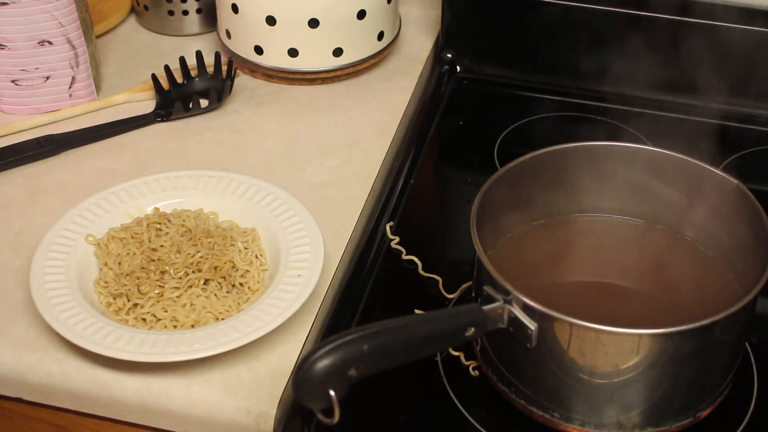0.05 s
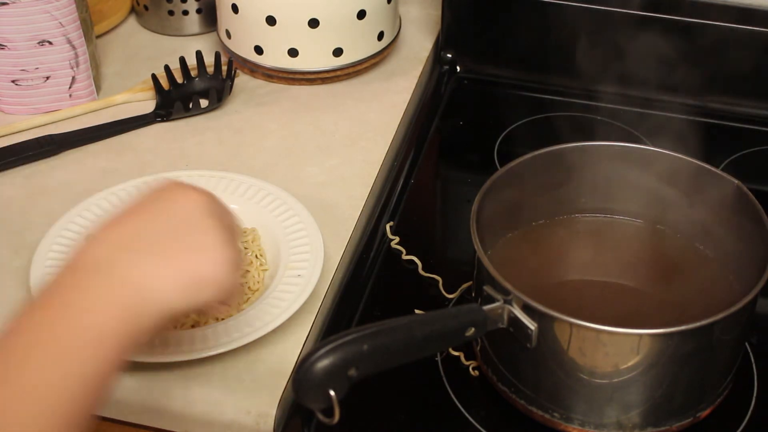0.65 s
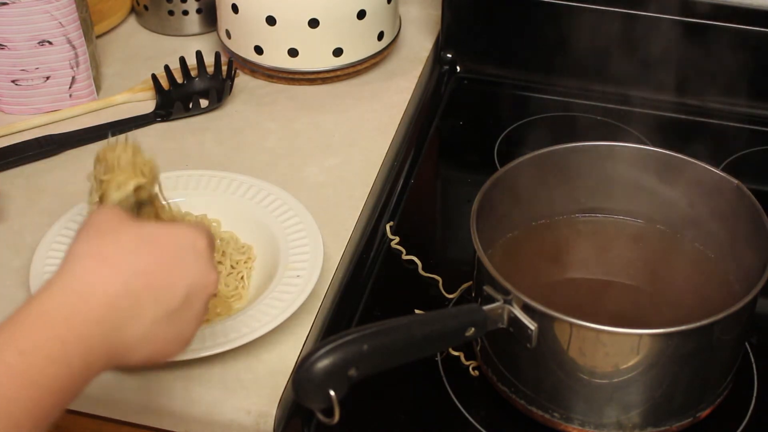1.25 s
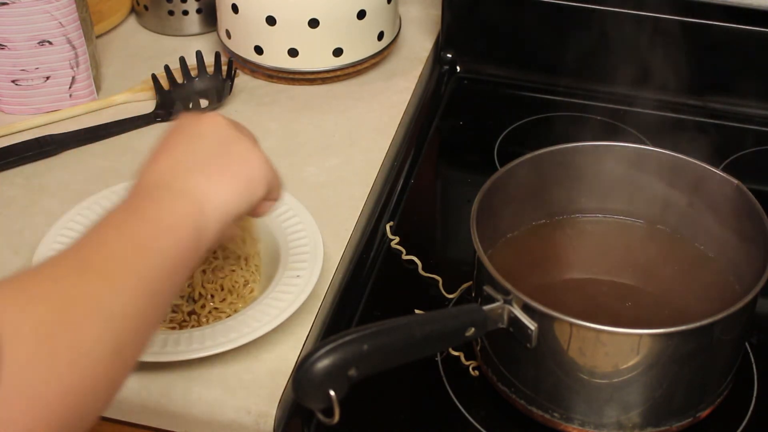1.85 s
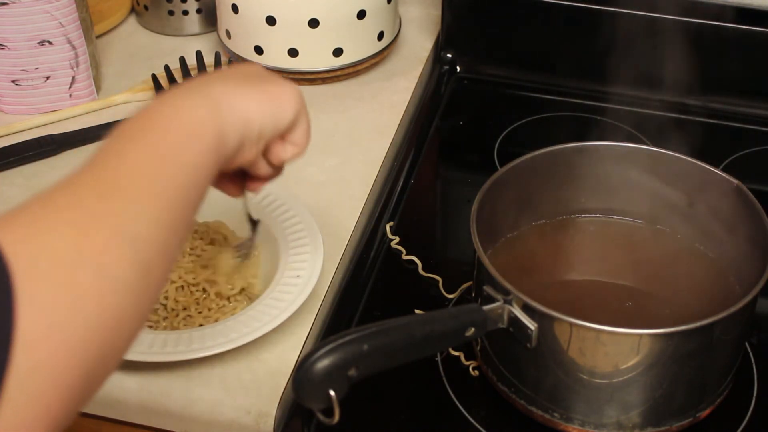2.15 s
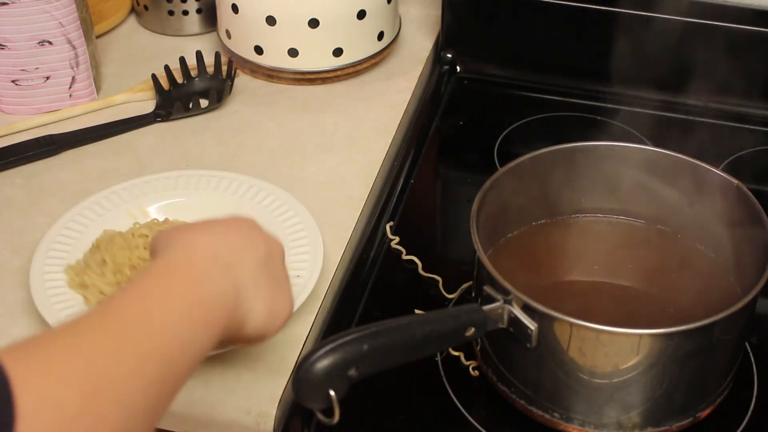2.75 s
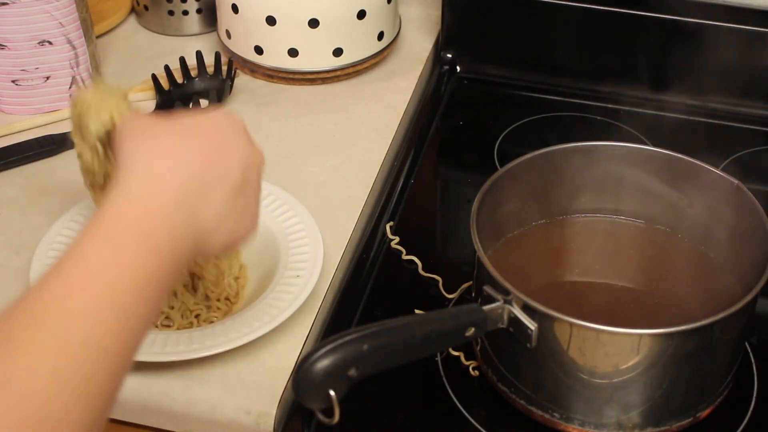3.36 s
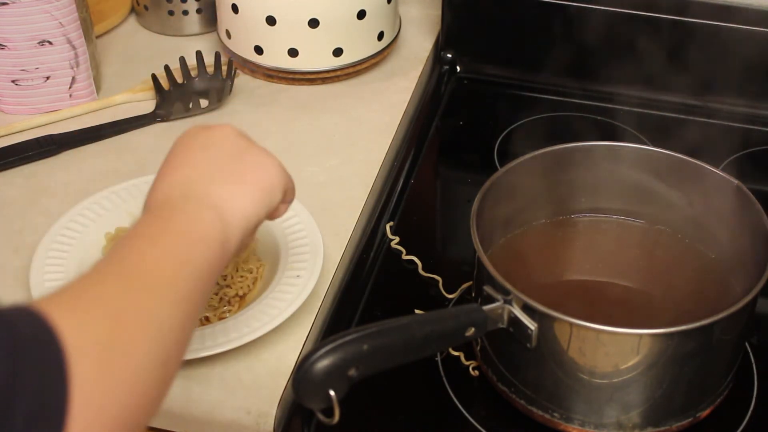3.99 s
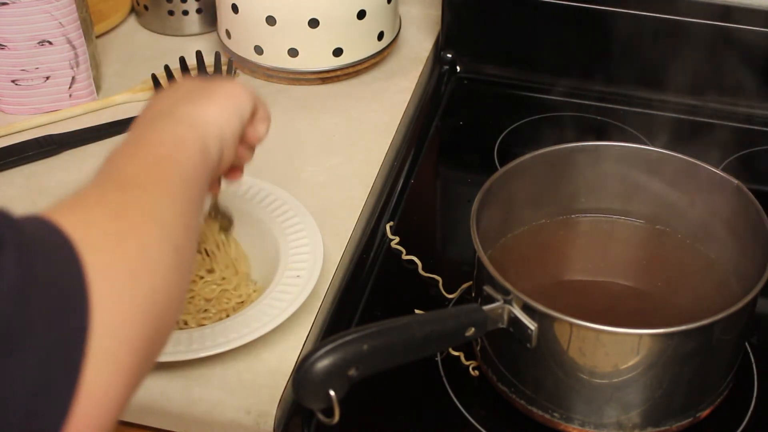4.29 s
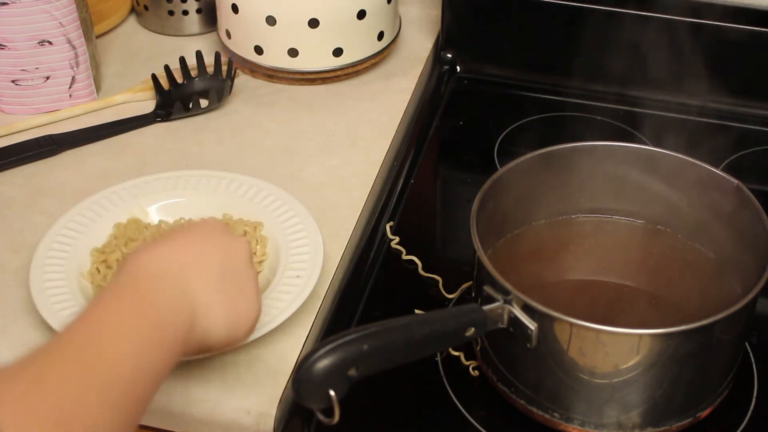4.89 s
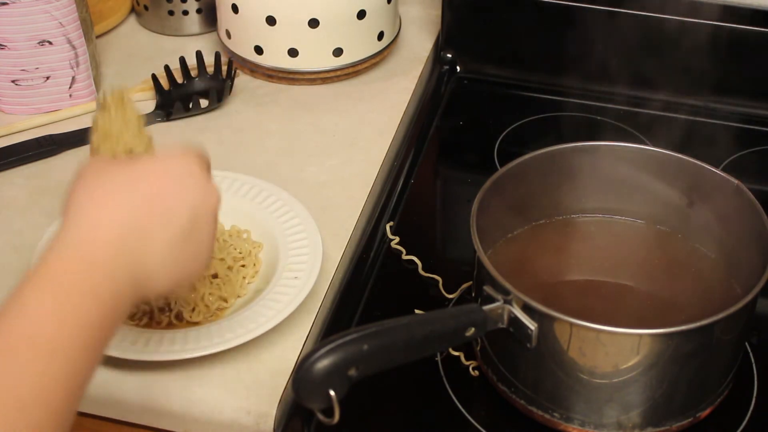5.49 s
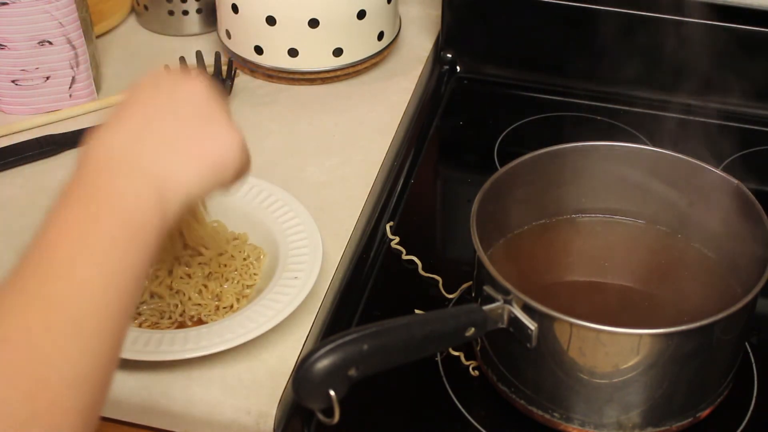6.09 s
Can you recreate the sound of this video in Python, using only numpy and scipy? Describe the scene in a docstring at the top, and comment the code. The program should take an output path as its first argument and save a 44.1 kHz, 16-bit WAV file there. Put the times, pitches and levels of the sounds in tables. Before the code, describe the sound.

Right at the start, cutlery slides faintly across a kitchen counter, dulling and stopping by 0.7 seconds, while something hard lands with a sharp clack at about 0.1 seconds. At 0.8 seconds a steel fork hits a ceramic plate with a bright, ringing clink, the loudest sound, followed at once by a thin metallic tick. Wet noodles crackle very softly as they are lifted in three swells, beginning around 0.8, 2.6 and 4.8 seconds. Tiny wet smacks come near 1.6, 1.8, 3.8 and 5.5 seconds. The tines tick and rasp lightly on the glaze at 2.6 and 4.2 seconds, and a second, softer clink with a tick comes at 4.8 seconds. Everything is close to the microphones, with the short reverberation of a small kitchen. A faint, steady appliance hum and hiss run until the end at about 6 seconds.

```python
"""Cutlery slides on a kitchen counter and something hard lands with a clack.
Then a steel fork turns noodles on a ceramic plate: its blows ring the glaze, its tines tick
and rasp, and wet strands smack faintly as they part. Two close microphones hear the counter;
behind it a small, lively kitchen answers each blow over a steady appliance hum."""
import sys
import numpy as np
from scipy import signal
from scipy.fft import rfft, irfft
from scipy.io import wavfile

SR = 44100
rng = np.random.default_rng(int(sys.argv[2]) if len(sys.argv) > 2 else 0)


def persist_wave(psi):
    """Save psi, clipped to +-1, as 16-bit WAV."""
    counts = np.round(np.clip(psi, -1, 1) * 32767).astype(np.int16)
    wavfile.write(sys.argv[1], SR, np.atleast_2d(counts).T)


N = 270710
TIME = np.arange(N) / SR


def undb(db):
    """Decibels to gain."""
    return 10 ** (np.asarray(db) / 20)


def add(track, s, sound):
    """Mix a sound into a track at time s."""
    i = max(int(s * SR), 0)
    track[i:i + len(sound)] += sound[:N - i]


def along(hz, points):
    """Read (Hz, value) points on a log-frequency axis."""
    f, value = np.transpose(points)
    return np.interp(np.log(hz + 1), np.log(f), value)


def noise(gain_at, size=N):
    """Noise of rms 1 whose spectrum follows gain_at(Hz)."""
    hz = np.fft.rfftfreq(size, 1 / SR)
    x = irfft(gain_at(hz) * np.exp(2j * np.pi * rng.random(len(hz))), size)
    return x / np.sqrt(np.mean(x ** 2))


def band(hz, half_width_hz):
    """Noise in one resonance with steep skirts."""
    return noise(lambda f: 1 / (1 + ((f - hz) / half_width_hz) ** 2))


def fade(t60, size=16384):
    """Exponential decay, 60 dB in t60 seconds."""
    return np.exp(-np.log(1000) * TIME[:size] / t60)


def ring(modes, size=16384):
    """Struck (Hz, dB, t60) modes; neighbours swing in opposite directions."""
    return sum((-1) ** k * undb(db) * fade(t60, size) * np.sin(2 * np.pi * hz * TIME[:size])
               for k, (hz, db, t60) in enumerate(modes))


def burst(colour, t60):
    """Many crowded, quickly damped modes: a short burst of coloured noise."""
    blocks = [noise(lambda f: undb(along(f, colour)), size=1024) for _ in range(4)]
    return np.concatenate(blocks) * fade(t60, size=4096)


def radiate(x, low_hz):
    """A small object cannot radiate deep bass."""
    return signal.sosfilt(signal.butter(4, low_hz, "high", fs=SR, output="sos"), x)


def stroke(t, attack_s, hold_s, release_s):
    """Gain of a movement that starts at t = 0: it builds, holds and dies away."""
    return np.clip(np.minimum(t / attack_s, 1 - (t - attack_s - hold_s) / release_s), 0, 1)


# kitchen air and hiss at the microphones: f/Hz, relative density/dB
AIR_SPECTRUM = [(12, -43.5), (20, -15), (27, -15.5), (64, -6.5), (85, -20), (119, -5.5), (148, -19),
                (219, -2), (259, -9.5), (439, -11), (505, -9), (958, -17), (1340, -19.5), (2680, -24.5),
                (15500, -27)]
# extra colouring of the pair's side signal: f/Hz, gain/dB
SIDE_COLOUR = [(30, -2.5), (60, -7), (130, -12), (250, -16.5), (700, -13), (2000, -6), (6000, -3.5),
               (14000, -4.5)]
# appliance in the background: f/Hz, width/Hz, level/dB
HUM_BANDS = [(57.6, 8.8, -82), (224.3, 11, -68)]

def room_tone(mid_db=-59.5, side_db=-65):
    """Steady rush of air and microphone hiss, with the wavering hum of an appliance."""
    mid = undb(mid_db) * noise(lambda f: undb(along(f, AIR_SPECTRUM)))
    side = undb(side_db) * noise(lambda f: undb(along(f, AIR_SPECTRUM) + along(f, SIDE_COLOUR)))
    hum = sum(undb(db) * band(hz, width / 2) for hz, width, db in HUM_BANDS)
    return mid + hum + np.array([side, -side])


# the small kitchen's reverberation, by band: f/Hz, level/dB, t60/s
REVERB_BANDS = [(120.2, -2, .4), (400, -3, 0.35), (998.6, -4.5, .42), (2368, -8.5, .42), (4500, -9, 0.42),
                (6970, -7.5, 0.43), (9966, -8.5, .27), (15120, -10.5, .2)]

def kitchen(direct, gap_s=.004, build_s=0.0054, side_db=-25, size=32768):
    """Direct sound and a diffuse tail, shorter in the top treble; two close microphones nearly agree."""
    hz = np.fft.rfftfreq(size, 1 / SR)
    centres = np.array(REVERB_BANDS)[:, 0]
    swell = np.clip((TIME[:size] - gap_s) / build_s, 0, 1)
    scatter = rfft(rng.standard_normal((2, size)))
    tails = 0
    for share, (_, db, t60) in zip(np.eye(len(centres)), REVERB_BANDS):
        reflections = irfft(scatter * along(hz, np.c_[centres, share]))
        decay = swell * fade(t60, size)
        tails = tails + undb(db) * reflections * decay / np.linalg.norm(decay)
    mid, side = (signal.fftconvolve(direct, tail)[:N] for tail in tails)
    return direct + mid + undb(side_db) * np.array([side, -side])


# resonances of cutlery sliding on the counter: f/Hz, width/Hz, relative level/dB
CUTLERY_BANDS = [(1440, 90, -9), (1664, 220, -2), (2220, 740, -3), (3266, 300, -3), (3820, 240, -4.5),
                 (4250, 250, -7), (4884, 200, -8.5), (6300, 900, -8), (7950, 1100, -6)]

def cutlery(drag_db=-64, brisk_db=14.5, slowing_s=0.084, stop_s=.68, stopping_s=.16, dulling=.3):
    """Uneven friction keeps the metal sounding: it starts briskly, dulls as it slows, and stops."""
    speed_db = brisk_db * np.exp(-TIME / slowing_s)
    moving = np.clip((stop_s - TIME) / stopping_s, 0, 1)
    tilt_db_per_octave = dulling * (speed_db - brisk_db)
    lowest_hz = CUTLERY_BANDS[0][0]
    metal = sum(undb(db + tilt_db_per_octave * np.log2(hz / lowest_hz)) * band(hz, width / 2)
                for hz, width, db in CUTLERY_BANDS)
    catching_db = 2 * band(0, half_width_hz=35)
    return moving * undb(drag_db + speed_db + catching_db) * metal


# a hard thing lands on the counter, rebounds and settles: t/s, snap level/dB, body level/dB
LANDINGS = [(0.0655, -13.5, 0.5), (0.0752, -23.5, -13), (0.174, -51, -16)]
# snap of one edge: f/Hz, relative level/dB
SNAP_SPECTRUM = [(60, 7), (130, -10), (400, -1.5), (800, 0.5), (1400, 8), (2000, -0.5), (3000, 0),
                 (5200, -3), (6700, -3.5), (8000, 2), (9200, 0), (10800, -11.5), (13700, -11.5),
                 (15500, -26)]
# its hollow body: f/Hz, relative level/dB, t60/s
BODY_MODES = [(420, -29.5, 0.038), (712, -35, 0.059), (850, -35, 0.063), (1239, -22.5, 0.048),
              (1420, -14, 0.014), (1690, -36, 0.023), (1940, -27, 0.019)]

def clack(snap_t60=0.027, edges=3, edge_gap_s=.0021, edge_loss_db=6):
    """Edge after edge touches, each more softly; the body rings as its weight lands on the second."""
    out = np.zeros(N)
    for s, snap_db, body_db in LANDINGS:
        for edge in range(edges):
            snap = radiate(burst(SNAP_SPECTRUM, snap_t60), low_hz=113)
            add(out, s + edge * edge_gap_s, undb(snap_db - edge * edge_loss_db) * snap)
        add(out, s + edge_gap_s, undb(body_db) * radiate(ring(BODY_MODES), low_hz=448))
    return out


# the fork digs into the heap on the plate: t/s, base level of the wet crackle/dB
NOODLE_LIFTS = [(0.8, -68.5), (2.57, -71), (4.77, -71)]
# the clearest wet smacks: t/s, level/dB, starting f/Hz
WET_SMACKS = [(1.557, -53.5, 6900), (1.785, -53, 3930), (3.848, -55, 4690), (5.471, -50, 3400)]
# quick shoves through the heap: t/s, level/dB, centre f/Hz
HEAP_SHOVES = [(0.76, -59, 1326), (2.184, -65.5, 950)]

def noodles(gather_s=.4, lift_s=0.53, let_go_s=.76, pops=700, pop_t60=0.016, heap_hz=1350, shove_s=.05):
    """Wet strands part in tiny pops while a forkful is lifted; the heap swishes as it slides."""
    effort = sum(undb(db) * stroke(TIME - s, gather_s, lift_s, let_go_s) for s, db in NOODLE_LIFTS)
    when, pitch, size = rng.random((pops, 3)).T
    pop_times = when * N / SR
    pop_gains = undb(10 * size ** 3) * np.interp(pop_times, TIME, effort)  # a few up to 10 dB louder
    crackle = zip(pop_times, pop_gains, 2600 * 3.5 ** pitch)
    smacks = [(s, undb(db), hz) for s, db, hz in WET_SMACKS]
    out = undb(-3) * effort * band(heap_hz, 0.22 * heap_hz)  # the sliding heap
    t = TIME[:2048]
    for s, gain, hz in [*smacks, *crackle]:
        # the film of broth tightens as it bursts, so the pitch rises
        chirp = np.sin(2 * np.pi * hz * t * (1 + 7 * t))
        add(out, s, gain * fade(pop_t60, len(t)) * chirp)
    for s, db, hz in HEAP_SHOVES:
        out += undb(db) * np.exp(-((TIME - s) / shove_s) ** 2) * band(hz, .3 * hz)
    return out


# the plate pressed against the counter: multiple of the thud pitch, relative level/dB
THUD_SPECTRUM = [(.15, -20), (.36, 1.5), (.6, -8), (1, 8.5), (1.5, -4.5), (2.2, -8), (4, -20), (8, -34.5),
                 (30, -59.5)]

def thud(hz, t60=0.0744, rise_s=0.00606):
    """The counter takes up a push slowly and gives it back as a dull knock."""
    knock = burst([(ratio * hz, db) for ratio, db in THUD_SPECTRUM], t60)
    rise = np.minimum(TIME[:len(knock)] / rise_s, 1)
    return radiate(knock * rise, low_hz=125)


# light ticks on the plate, close by:
# t/s, level/dB, brightest f/Hz, spread/octaves, rasp gain/dB, thud level/dB, thud f/Hz
TINE_TICKS = [(0.8635, -22, 6630, 0.052, -32, -70, 406), (2.5661, -38, 8200, 1.76, 4.5, -45.5, 163),
              (4.2353, -32.5, 5850, 0.12, -8, -47, 385), (4.8085, -37, 9200, 0.37, -1, -69, 410)]
# the steel fork: f/Hz, relative level/dB, t60/s
FORK_MODES = [(1474, 2.5, 0.042), (2320, -4, 0.042), (3040, -1.5, 0.054), (3600, -22.5, 0.036),
              (4350, -12, 0.097), (5600, -19, 0.02), (5940, -3.5, 0.017), (6600, -4, 0.049),
              (7570, -2, 0.023), (7660, -18, 0.087), (7810, 1.5, 0.048), (9370, -9, 0.066),
              (10430, -7, .08), (9700, -56, 0.057), (12400, -6, 0.076), (13600, -5, .04), (13900, -8, .04),
              (15200, -11, .04)]
# tines rasping on the glaze: f/Hz, relative level/dB
RASP_SPECTRUM = [(700, 0.5), (1600, 1), (2200, -7), (3300, 2), (5000, -9), (7500, 6), (11000, -14),
                 (15000, -5.5)]

def fork(rasp_db=-14, rasp_t60=0.12, off_band_db=-24, ring_db=-8):
    """Tines graze the plate: a short rasp and the fork's own modes, over a soft thud."""
    out = np.zeros(N)
    for s, db, bright_hz, spread, graze_db, thud_db, thud_hz in TINE_TICKS:
        modes = []
        for hz, mode_db, t60 in FORK_MODES:
            drive_db = max(-4 * (np.log2(hz / bright_hz) / spread) ** 2, off_band_db)
            modes.append((hz, mode_db + drive_db, t60))
        add(out, s, undb(db + ring_db) * ring(modes))
        add(out, s, undb(db + rasp_db + graze_db) * burst(RASP_SPECTRUM, rasp_t60))
        add(out, s, undb(thud_db) * thud(thud_hz))
    return out


# fork blows on the plate, close to the microphones:
# t/s, level/dB, place (0 wall, 1 well), contact cut-off f/Hz, crack gain/dB, thud level/dB, thud f/Hz
FORK_BLOWS = [(0.8024, 0, 0.081, 13030, -21, -30, 446), (4.7725, -15, 1, 10900, -23, -46, 550)]
# the ceramic plate: f/Hz, level struck on its wall/dB, level struck in its well/dB, t60/s
PLATE_MODES = [(446, -36, -48.5, .09), (836, -38.5, -43, 0.22), (1004.6, -27, -22.5, .17),
               (1234, -29.5, -32.5, .08), (1453, -34, -29.5, 0.045), (1630, -28, -40, .09),
               (2140, -25.5, -20.5, 0.03), (2286, -20.5, -26.5, 0.036), (2375, -9, -8, 0.067),
               (2520, -25, -36, .08), (2660, -29, -41.5, .07), (3080, -30.5, -49.5, .06),
               (3490, -18.5, -23, 0.097), (3740, -26.5, -35.5, 0.064), (4034, -21.5, -25, 0.11),
               (4314, -33, -35, 0.14), (4800, -20, -17.5, 0.072), (5120, -32.5, -33.5, 0.12),
               (6370, -33.5, -34.5, .08), (6630, -31, -30, 0.13), (6960, -30, -41, .12),
               (7620, -39, -39.5, 0.12), (8930, -36.5, -49, 0.091), (9200, -35.5, -37, 0.098),
               (10680, -60.5, -55.5, 0.049), (11760, -35, -33, 0.051), (13312, -51, -44.5, .1)]
# crack of steel on glaze: f/Hz, relative level/dB
CRACK_SPECTRUM = [(150, -13.5), (400, -4), (900, -3), (2000, -1), (4000, -4.5), (5000, -9), (6000, -12.5),
                  (8000, -17), (15000, -27.5)]

def plate(crack_t60=0.075, contact_s=0.0011):
    """Each blow rings the plate according to where it lands, and knocks it against the counter."""
    out = np.zeros(N)
    for s, db, place, cut_hz, crack_db, thud_db, thud_hz in FORK_BLOWS:
        modes = []
        for hz, wall_db, well_db, t60 in PLATE_MODES:
            # a longer contact cannot drive the highest modes
            loss_db = 10 * np.log10(1 + (hz / cut_hz) ** 4)
            modes.append((hz, wall_db + place * (well_db - wall_db) - loss_db, t60))
        clink = ring(modes)
        add(clink, 0, undb(crack_db) * burst(CRACK_SPECTRUM, crack_t60))
        rise = np.minimum(TIME[:len(clink)] / contact_s, 1)
        add(out, s, undb(db) * radiate(clink * rise, low_hz=330))
        add(out, s, undb(thud_db) * thud(thud_hz))
    return out


def scene():
    """All sources on the counter, heard from close by in the kitchen."""
    counter = plate() + fork() + clack() + cutlery() + noodles()
    return kitchen(counter) + room_tone()


def record(dry):
    """The camera cuts the top steeply above 15.8 kHz."""
    return signal.sosfilt(signal.ellip(10, .1, 80, 15800, fs=SR, output="sos"), dry)


dry = scene()
out = record(dry)
persist_wave(out)
```